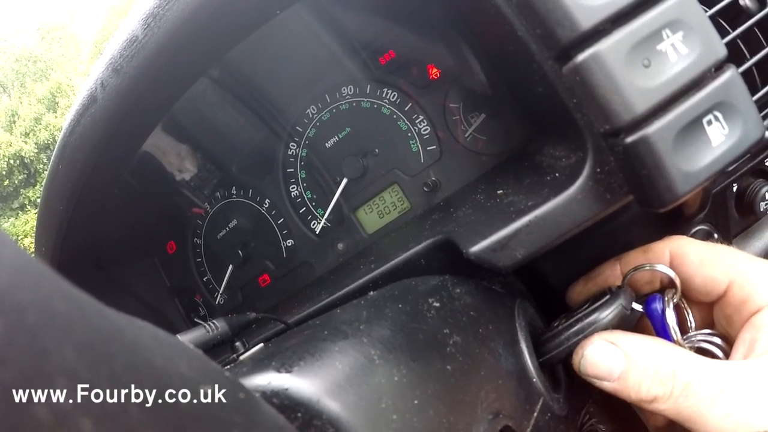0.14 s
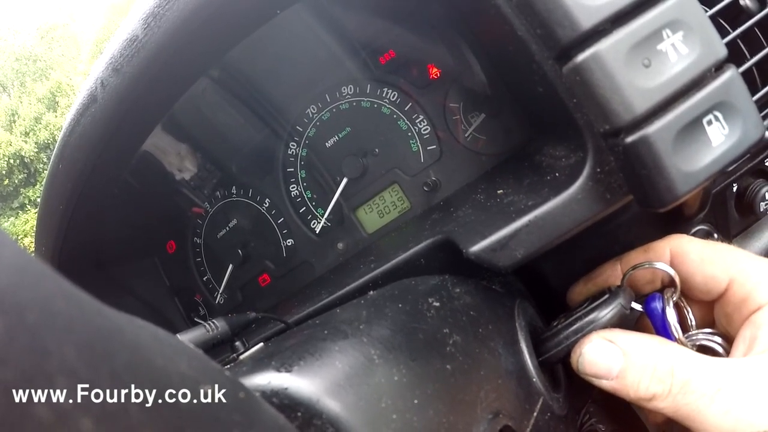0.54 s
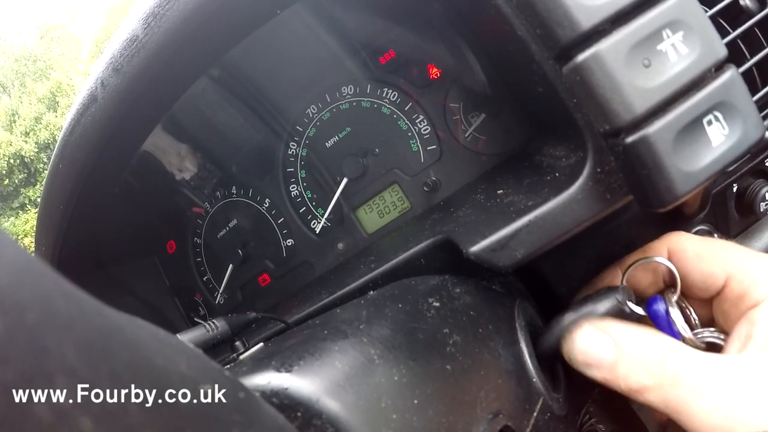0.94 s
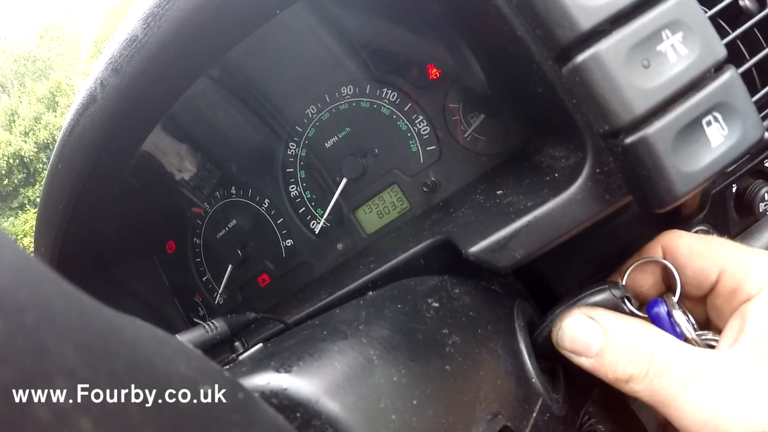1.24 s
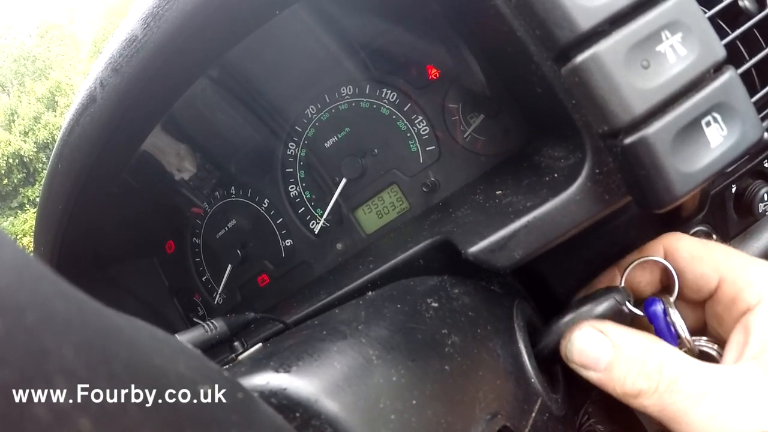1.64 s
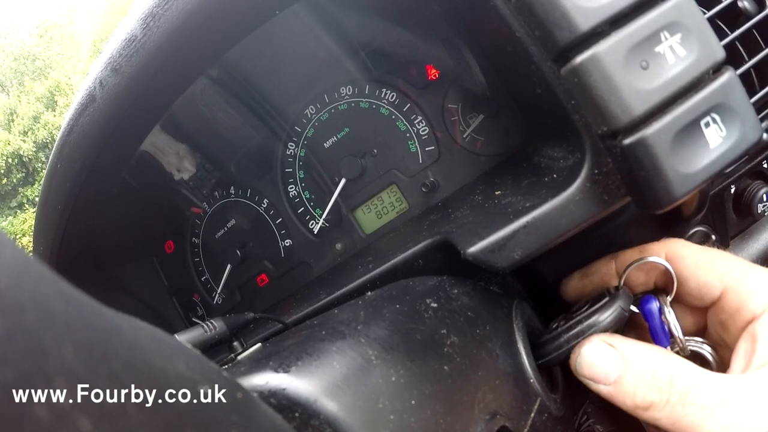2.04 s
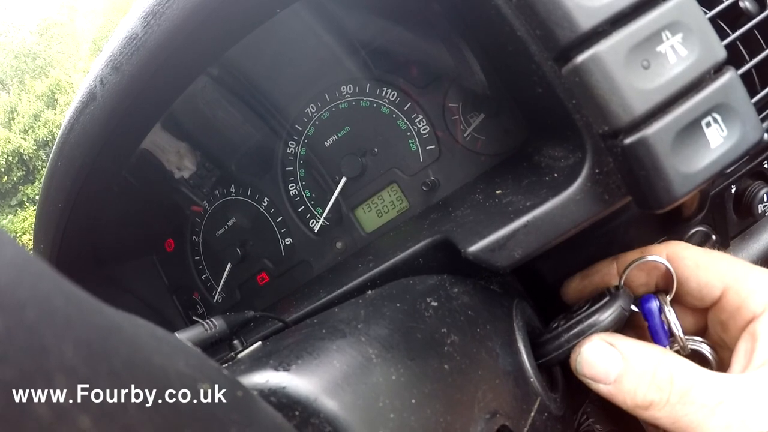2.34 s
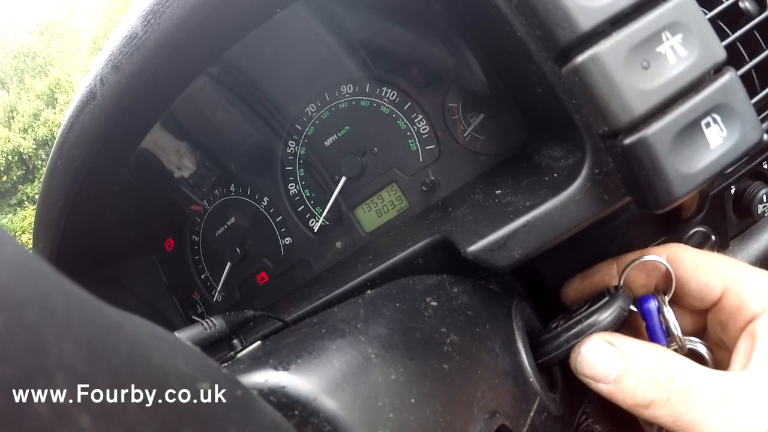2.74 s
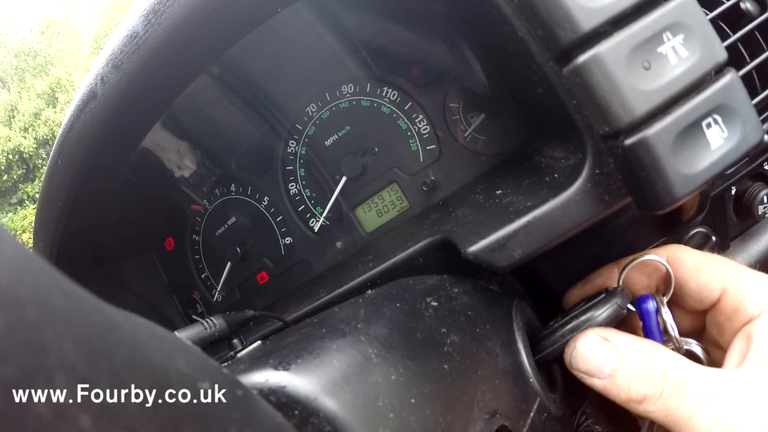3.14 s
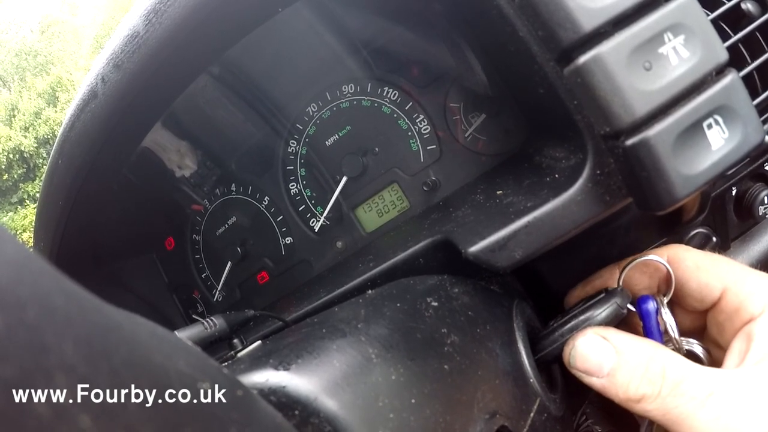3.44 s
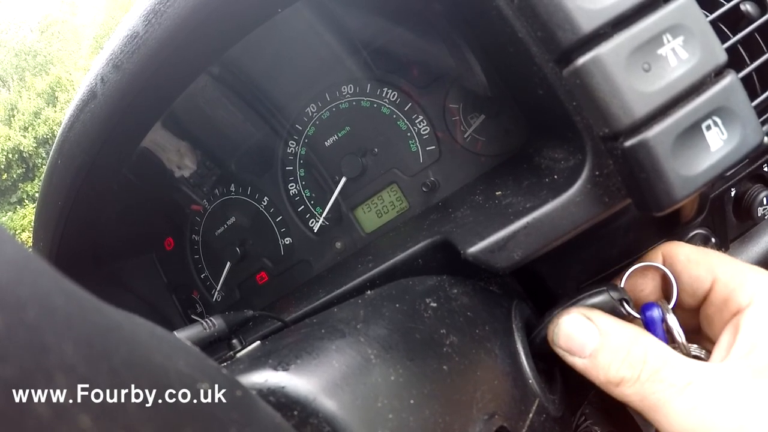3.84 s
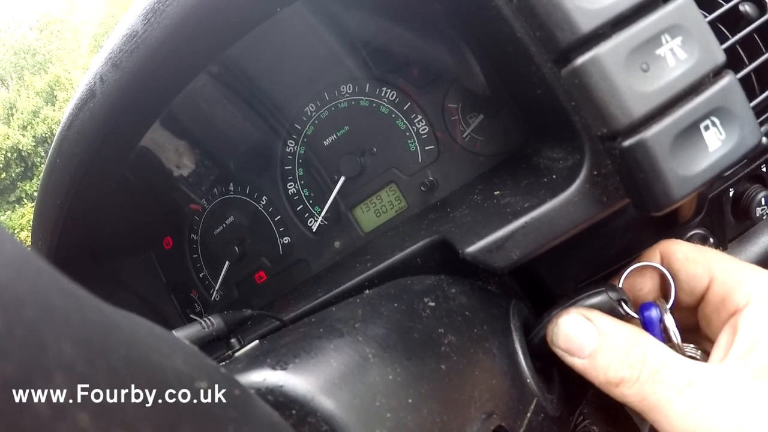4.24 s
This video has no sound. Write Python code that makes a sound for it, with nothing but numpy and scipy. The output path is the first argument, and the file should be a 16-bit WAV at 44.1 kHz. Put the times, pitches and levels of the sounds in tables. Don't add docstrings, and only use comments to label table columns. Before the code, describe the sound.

A dry electric pump buzz stops with a relay snap, restarts after key jingles and a click, then stops again over a deep cabin thump.

```python
import sys
import numpy as np
from scipy import signal
from scipy.fft import rfft, irfft
from scipy.io import wavfile
from scipy.ndimage import uniform_filter1d

SR = 44100
rng = np.random.default_rng(int(sys.argv[2]) if len(sys.argv) > 2 else 0)


def convert_level_to_amplitude(level_db):
    exponent = np.asarray(level_db, float) / 20
    return 10 ** exponent


def wav_record(signal):
    frames = np.transpose(np.atleast_2d(signal))
    bounded = np.clip(frames, -1, 1)
    quanta = np.round(bounded * 32767).astype(np.int16)
    wavfile.write(sys.argv[1], SR, quanta)


N = 193025
T = np.arange(N) / SR

# power on in seconds, key reaches start in seconds,
# relay cuts the power in seconds, turns per second at first, share of a turn already made.
PUMP_RUNS = [
    (0, 1.065, 1.297, 49.014, .343),
    (1.74, 3.768, 4.018, 41.256, .427),
]
# pitch in Hz, level in dB, time to fade by 60 dB in seconds, travel through the metal in ms.
HOUSING = [(1982.6, 5.5, .017, 1.09), (2422, -9, .036, 1.025), (2061, -14.5, .047, .07),
           (2231.5, 8, .022, .07), (2184, 6.5, .043, .98), (2800, -14, .04, .45), (3040, -6, .027, .6),
           (3567, -4.5, .016, .6), (5020, -7, .0094, .5)]
FLOOR = [(239.4, -7.5, 0.1, 4.59), (366, -11, 0.088, 4.93), (457, -17, 0.063, 5.13), (566, 2, 0.084, 6.37),
         (689.3, 0.5, 0.081, 6.48), (627, -5, .06, 6.39)]
BULKHEAD = [(952, 4.5, 0.058, 1.945), (1000, 2, 0.09, 1.917), (1178, -6.5, 0.031, 1.63),
            (1348, -18, 0.15, 1.724), (1464, -13.5, 0.079, 1.244), (1770, -12, 0.067, 1.43)]
BRACKET = [(1026, 1, 0.019, 1.24), (888, -4.5, 0.026, 1.67)]
VALVE = [(3070, -5, 0.026, 0), (3450, -4, 0.039, 0), (2072, 2.5, 0.018, 0)]
FULL_TURNS_S, SPIN_UP_S, SAG_TURNS_S2 = 51.941, 1.376, 12
PRESSURE_FROM, PRESSURE_FULL = 43, 46.26
# dB at full pressure, dB lost without pressure,
# dB gained per extra turn a second, dB lost when the voltage sags.
FLOOR_LOAD = (-61, 6, -0.28, 2)
BULKHEAD_LOAD = (-62, -7.5, 0.6, 7)
HOUSING_LOAD = (-60, -2, 0.56, 15)
BRACKET_LOAD = (-74, -9, 0.25, -10)
SAG_S, SAG_FADE_DB_S = 0.016, 30
PUMP_LEAD_MS = 3.5
REBOUND_MS, REBOUND_DB, REBOUND_SLACK_DB, HOUSING_REBOUND_DB = 2.5, 9, 8.5, 2.6
VALVE_MS, VALVE_SCATTER_MS, VALVE_DB = 9.8, 0.15, -10.5
HOUSING_FROM_HZ = 1850


def pump():
    out = np.zeros(N)
    for on_s, sag_s, off_s, first, start in PUMP_RUNS:
        fed = (T >= on_s) & (T < off_s)
        sagged = np.maximum(T - sag_s, 0)
        spin_up = np.exp(-np.maximum(T - on_s, 0) / SPIN_UP_S)
        speed = FULL_TURNS_S - (FULL_TURNS_S - first) * spin_up - SAG_TURNS_S2 * sagged
        turns = start + np.cumsum(speed * fed) / SR
        whole_turns = np.arange(1, int(turns[-1]) + 1)
        s = np.interp(whole_turns, turns, T) - PUMP_LEAD_MS / 1000
        slack = np.clip((PRESSURE_FULL - speed) / (PRESSURE_FULL - PRESSURE_FROM), 0, 1) * (T < sag_s)

        chance = rng.standard_normal((120, 3))[:len(s)].T
        rub = convert_level_to_amplitude(-44) * rng.standard_normal(N)
        knock = knocks(s, 0.65 * chance[0]) + rub
        rebound = knocks(s + REBOUND_MS / 1000, 0.59 * chance[1])
        drive = knock + convert_level_to_amplitude(REBOUND_DB - REBOUND_SLACK_DB * slack) * rebound
        valve_s = s + (VALVE_MS + VALVE_SCATTER_MS * chance[1]) / 1000
        valve = convert_level_to_amplitude(VALVE_DB) * unit(shake(knocks(valve_s, 1.2 * chance[2]), VALVE))
        shell = shake(knock + convert_level_to_amplitude(HOUSING_REBOUND_DB) * rebound, HOUSING)
        housing = unit(band(shell, HOUSING_FROM_HZ, 9000, order=3)) + valve

        parts = ((shake(drive, FLOOR), FLOOR_LOAD),
                 (shake(drive, BULKHEAD), BULKHEAD_LOAD),
                 (housing, HOUSING_LOAD),
                 (shake(knock, BRACKET), BRACKET_LOAD))
        for body, (db, slack_db, per_turn_db, sag_db) in parts:
            db = db - slack_db * slack - per_turn_db * (FULL_TURNS_S - 2 - speed)
            db = db - sag_db * np.minimum(sagged / SAG_S, 1) - SAG_FADE_DB_S * sagged
            out += body / body[fed].std() * convert_level_to_amplitude(db) * fed
    return out


# start in seconds, peak in dB, contact rattle in ms,
# dashboard peak in dB, delay of the dashboard in ms.
OPENINGS = [
    (1.2968, -31.5, 4.6, -37.5, 8.1),
    (4.0185, -32, 5, -38, 8.6),
]
CLOSINGS = [
    (2.037, -25.5, 2.7, -39.5, 3.6),
]
# pitch in Hz, level in dB, time to fade by 60 dB in seconds.
RELAY_OPEN = [(720, -7, .05), (917, -6, .04), (1195, 0, .02), (1485, -2, .02), (1680, -4, .025),
              (2113, -9, .025), (2690, -13, .02), (2990, -12, .02), (3342, -13, .025), (4430, -12, .01),
              (5150, -17, .012), (6500, -21, .012)]
RELAY_SHUT = [(707, -6.5, 0.038), (905, -16.5, 0.064), (1290, 3, 0.01), (2377, -30, 0.018),
              (3040, -9, 0.014), (3454, -1, 0.087), (4430, 1.5, 0.02), (4930, 9, 0.0085), (6090, 0, 0.026),
              (6160, 0, 0.017), (6910, -3.5, 0.022), (7700, -9, 0.016), (8850, -26, 0.0084)]
DASH = [(324, 0.5, .1), (412, -1, .07), (262, -10, .06), (160, 7, .11)]
# time in ms, level in dB.
BOUNCES_OPEN = [(0, -12), (2.0, 0), (4.7, -3), (7.2, -4), (10, -9), (13.5, -8)]
BOUNCES_SHUT = [(0, 2), (1.1, -2.5), (2.2, 5.5), (4.4, -6), (7, -4.5), (12, -12)]


def relay():
    out = np.zeros(N)
    kinds = ((OPENINGS, RELAY_OPEN, BOUNCES_OPEN, 1400, 5.5),
             (CLOSINGS, RELAY_SHUT, BOUNCES_SHUT, 4300, 11))
    for events, modes, bounces, crack_hz, slope_db in kinds:
        case = unit(ring(taps(bounces), modes))
        for s, db, rattle_ms, dash_db, lag_ms in events:
            snap = crack(crack_hz, 1.55 * rattle_ms, slope_db)
            add(out, s, case + convert_level_to_amplitude(-2.5) * snap, db)
            add(out, s + lag_ms / 1000, swell(DASH, 335, .05), dash_db)
    return out


# start in seconds, peak in dB, pitch struck hardest in Hz,
# bare crack in dB, crack decay in ms.
KEY_TICKS = [(1.0505, -35.5, 7000, 4, 4.2), (1.056, -40, 5530, 8, 5.5), (1.064, -45, 11660, -8, 4),
             (1.075, -45, 5835, 10, 4), (1.1097, -41.5, 6000, -6, 3.8), (1.1274, -54, 11660, 5, 3),
             (1.7632, -38, 14590, 20, 2.9), (1.7666, -35, 11660, 16, 5.7), (1.7788, -37, 5530, 1, 4.1),
             (1.782, -37, 11600, -7, 5), (1.792, -42, 14590, 9, 5), (1.796, -40, 11660, -9, 5),
             (1.8082, -33.5, 5750, 0, 2), (1.809, -35, 13200, 9, 8), (1.839, -53, 4430, -6, 3),
             (1.946, -56, 5900, -6, 3), (3.7324, -52.5, 5500, -9, 3), (3.808, -39, 11660, -5, 1.9),
             (3.809, -43.5, 5470, 3, 3.4), (3.817, -45.5, 5900, -16, 3.3), (3.896, -54, 11660, -3, 3),
             (3.896, -53, 6700, -5, 3), (3.931, -50.5, 5835, -8, 3)]
# pitch in Hz, level in dB, time to fade by 60 dB in seconds.
KEY_TONES = [(4430, -4, .02), (5530, -2, .03), (5835, 0, .04), (6900, -3, .015), (10270, -3, .03),
             (11660, -2, .016), (13280, -3, .02), (14590, 0, .03)]


def keys():
    out = np.zeros(N)
    for s, db, hz, crack_db, decay_ms in KEY_TICKS:
        modes = [(f, d - 45 * abs(np.log2(f / hz)), t60) for f, d, t60 in KEY_TONES]
        tone = ring(taps([(0, 0)]), modes)
        snap = band(burst(decay_ms, rise_ms=0.14), max(hz * 0.15, 2500), hz * 1.46, order=1)
        add(out, s, unit(tone) + convert_level_to_amplitude(crack_db) * unit(snap), db)
    return out


# start in seconds, peak in dB, middle pitch in Hz, time to fade by 60 dB in seconds.
LOCK_TAPS = [(.754, -48, 1790, 0.025), (1.051, -38.5, 2420, 0.016), (1.656, -52, 1380, 0.051),
             (1.676, -58, 4630, .04), (1.734, -39.5, 1260, 0.12), (3.251, -55, 5140, .015),
             (3.684, -35, 2276, 0.036), (3.685, -64, 4800, 0.016), (3.825, -41.5, 1490, 0.11)]
# start in seconds, peak in dB, pitch in Hz, time to fade by 60 dB in seconds.
THUDS = [(1.026, -44.5, 1350, .014), (1.099, -42.5, 1195, .018), (1.097, -47.5, 693, .05),
         (3.746, -48, 1300, .012), (1.657, -50.5, 1400, 0.016), (1.035, -49.5, 288, 0.046),
         (1.1, -56, 240, 0.09), (1.78, -49.5, 308, 0.091), (3.8, -49.5, 302, 0.043),
         (3.828, -46, 501, 0.041), (3.845, -40, 450, 0.028), (3.915, -43, 340, 0.032),
         (0.753, -65, 394, 0.05), (3.945, -51, 666, 0.027), (4.16, -52, 184, 0.038)]
# loudest moment in seconds, level in dB,
# rise in seconds, fall in seconds, treble in dB against that level.
SCRAPES = [(1.035, -48.5, 0.054, .03, -17), (1.058, -60.5, 0.019, .03, 15), (1.103, -36, 0.035, 0.032, -15),
           (1.659, -51.5, .05, 0.02, -16), (1.777, -41, 0.043, 0.024, -18),
           (1.815, -59.5, 0.034, 0.016, 18.5), (1.85, -51, .03, 0.025, -26), (3.73, -52, 0.046, 0.12, -22),
           (3.814, -68, 0.016, .02, 11), (3.837, -36, 0.013, 0.03, -22)]


def lock():
    out = np.zeros(N)
    for s, db, hz, t60 in LOCK_TAPS:
        shell = unit(ring(taps([(0, -3.5), (1.7, -5), (4.5, -8)]), [(hz, 0, .6 * t60)]))
        snap = crack(hz, t60 * 1000 / np.log(1000), slope_db=8.5)
        add(out, s, snap + convert_level_to_amplitude(-4) * shell, db)
    for s, db, hz, t60 in THUDS:
        add(out, s, swell([(hz, 0, t60)], hz, t60), db)

    slips = rng.standard_normal(N) * convert_level_to_amplitude(3.4 * np.minimum(rng.exponential(size=N), 4))
    catches = np.repeat(rng.standard_normal(N // 150 + 1), 150)[:N]
    slips *= convert_level_to_amplitude(4.5 * uniform_filter1d(catches, size=60))
    dull = level(band(slips, 190, 2360) + 0.63 * band(slips, 1020, 1080, order=1), 0)
    bright = level(band(slips, 1600, 6000, order=3), 0)
    for s, db, rise_s, fall_s, treble_db in SCRAPES:
        out += hump(s, db - 6, rise_s, fall_s) * (dull + convert_level_to_amplitude(treble_db) * bright)
    return out


# loudest moment in seconds, level in dB, rise in seconds, fall in seconds.
ROCKS = [(.29, -46.5, .1, .1), (.5, -48.5, 0.11, 0.079), (.99, -43.5, 0.32, 0.18), (1.14, -37, .06, 0.15),
         (1.34, -48, 0.088, 0.13), (1.75, -41, 0.074, 0.11), (1.84, -41.5, 0.11, .12),
         (2.85, -47.5, 0.073, 0.34), (3.33, -46, 0.14, 0.057), (3.93, -23, 0.14, 0.17),
         (4.15, -35.5, 0.17, 0.48)]
BOOMS = [(.46, -48.5, 0.13, 0.24), (1.17, -49, .1, 0.13), (1.6, -49, 0.33, 0.19), (1.78, -46.5, 0.17, 0.21),
         (1.95, -47, .08, 0.13), (2.09, -47, .1, 0.47), (2.45, -46.5, 0.59, 0.24), (2.68, -48, 0.15, 0.081),
         (3.0, -46, 0.44, 0.56), (3.27, -43, 0.57, 0.57), (3.88, -35, 0.093, 0.066),
         (4.02, -42, 0.089, 0.092), (4.33, -48.5, 0.12, .1)]
GRIPS = [(1.05, -56.5, .06, .06), (1.125, -50.5, 0.12, 0.043), (1.18, -55, 0.029, 0.041),
         (1.71, -57, 0.061, .1), (1.775, -52.5, 0.053, 0.16), (3.85, -47, 0.046, 0.2),
         (4.03, -55, 0.16, 0.065), (4.17, -65, 0.086, 0.18)]
ROCK_REST_DB, BOOM_REST_DB = -50, -55
BOOM_HZ, BOOM_WIDTH_HZ = 71, 10
FAN_HZ, FAN_DB, FAN_SAG_DB, FAN_SAG_S = 124.4, -68, 5, (1, 1.76)
# pitch in Hz, level in dB per Hz.
CABIN = [(60, -38), (95, -7.5), (150, -7), (550, -17), (2000, -27.5), (4000, -28), (9000, -36),
         (15000, -39)]
CABIN_DB = -65


def cabin():
    out = humps(ROCKS, ROCK_REST_DB) * steady(noise(20.0, 58.2, order=3))
    boom = noise(BOOM_HZ - BOOM_WIDTH_HZ / 2, BOOM_HZ + BOOM_WIDTH_HZ / 2)
    out += humps(BOOMS, BOOM_REST_DB) * steady(boom)

    fan_sags = (T > FAN_SAG_S[0]) & (T < FAN_SAG_S[1])
    fan = np.sin(2 * np.pi * FAN_HZ * T) + 1.3 * noise(FAN_HZ - 4, FAN_HZ + 4)
    out += convert_level_to_amplitude(FAN_DB - FAN_SAG_DB * fan_sags) * fan
    out += humps(GRIPS) * noise(130, 274, order=1)

    hz = np.maximum(np.arange(N // 2 + 1) * SR / N, 1)
    point_hz, point_db = np.transpose(CABIN)
    colour = convert_level_to_amplitude(np.interp(np.log(hz), np.log(point_hz), point_db))
    air = irfft(rfft(rng.standard_normal(N)) * colour, N)
    return out + air * convert_level_to_amplitude(CABIN_DB) / band(air, 427, 23000).std()


def knocks(s, db):
    out = np.zeros(N)
    whole = (s * SR).astype(int)
    out[whole] += convert_level_to_amplitude(db) * (whole + 1 - s * SR)
    out[whole + 1] += convert_level_to_amplitude(db) * (s * SR - whole)
    return out


def taps(rows, size=6000):
    out = np.zeros(size)
    for ms, db in rows:
        out[int(max(ms, 0) * SR / 1000)] += convert_level_to_amplitude(db)
    return out


def ring(x, modes):
    out = 0
    for k, (hz, db, t60) in enumerate(modes):
        pole = np.exp(2j * np.pi * hz / SR - np.log(1000) / (t60 * SR))
        out = out + (-1) ** k * convert_level_to_amplitude(db) * signal.lfilter([1], [1, -pole], x).imag
    return out


def shake(x, modes):
    out = 0
    for k, (hz, db, t60, ms) in enumerate(modes):
        tone = ring(x, [(hz, db, t60)])
        out = out + (-1) ** k * np.roll(tone, int(ms * SR / 1000))
    return out


def swell(modes, hz, t60):
    return ring(ring(taps([(0, 0)], size=8000), [(hz, 0, t60)]), modes)


def burst(decay_ms, rise_ms=0.45, grit_db=-0.5, size=6000):
    ms = np.arange(size) / SR * 1000
    slips = rng.standard_normal(size) * convert_level_to_amplitude(grit_db * np.minimum(rng.exponential(size=size), 3))
    return slips * (1 - np.exp(-ms / rise_ms)) * np.exp(-ms / decay_ms)


def crack(hz, decay_ms, slope_db):
    out = 0
    for f in 500 * 2. ** np.arange(6):
        octave = band(burst(decay_ms * (hz / f) ** 0.55), f / np.sqrt(2), f * np.sqrt(2))
        out = out + convert_level_to_amplitude(-slope_db * abs(np.log2(f / hz))) * octave / np.sqrt(f)
    return unit(out)


def hump(s, db, rise_s, fall_s):
    climb = (s - T) / max(rise_s, .003)
    drop = (T - s) / max(fall_s, .003)
    return convert_level_to_amplitude(db - 20 * np.where(T < s, climb, drop))


def humps(rows, rest_db=-120):
    return np.sqrt(convert_level_to_amplitude(rest_db) ** 2 + sum(hump(*row) ** 2 for row in rows))


def band(x, lo_hz, hi_hz, order=2):
    edges_hz = [lo_hz, min(hi_hz, .45 * SR)]
    return signal.sosfilt(signal.butter(order, edges_hz, "band", fs=SR, output="sos"), x)


def noise(lo_hz, hi_hz, order=2):
    return level(band(rng.standard_normal(N), lo_hz, hi_hz, order), 0)


def steady(x):
    return level(x / (np.sqrt(uniform_filter1d(x ** 2, size=2600)) + 0.35), 0)


def level(x, db):
    return x * convert_level_to_amplitude(db) / np.sqrt(np.mean(x ** 2))


def unit(x):
    return x / np.abs(x).max()


def add(out, s, sound, peak_db):
    i = int(s * SR)
    out[i:i + len(sound)] += (sound * convert_level_to_amplitude(peak_db) / np.abs(sound).max())[:N - i]


def scene():
    return (pump() + relay() + keys() + lock() + cabin())[None]


def roll_off(x):
    return signal.sosfilt(signal.butter(12, 16440, fs=SR, output="sos"), x)


def record(dry):
    return roll_off(dry)


dry = scene()
out = record(dry)
wav_record(out)
```